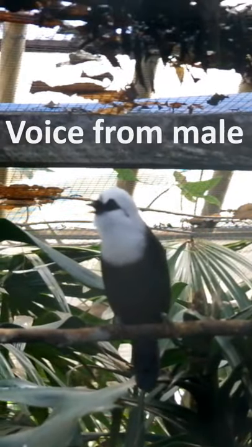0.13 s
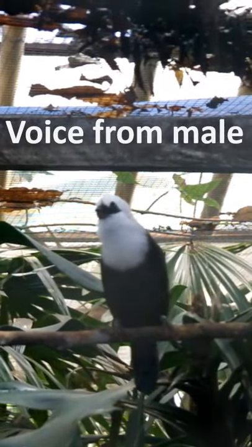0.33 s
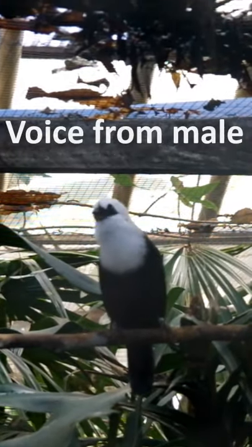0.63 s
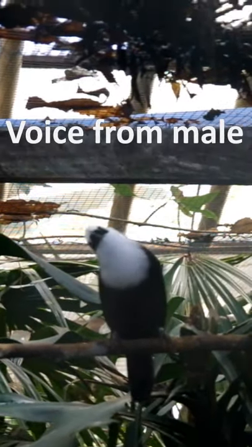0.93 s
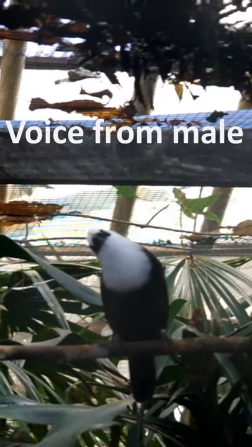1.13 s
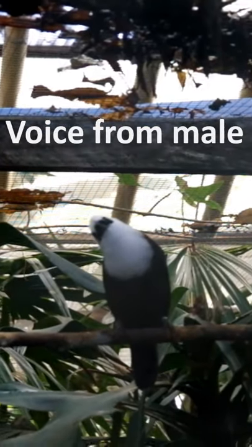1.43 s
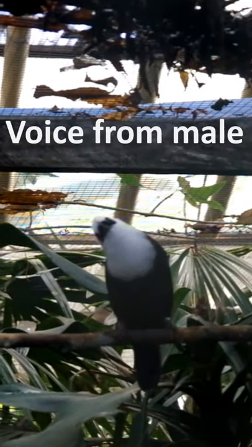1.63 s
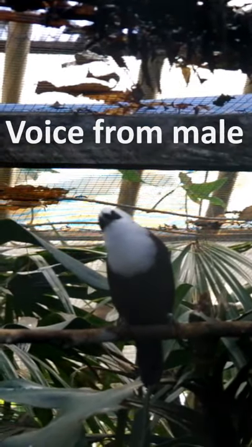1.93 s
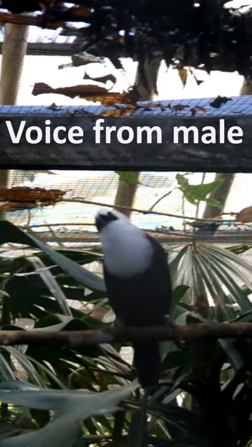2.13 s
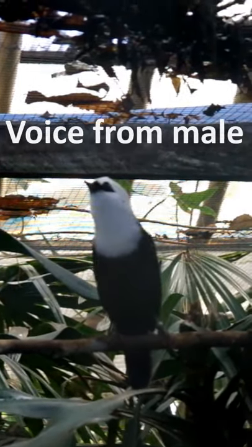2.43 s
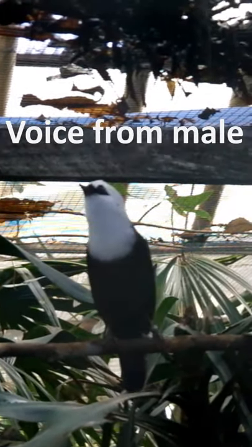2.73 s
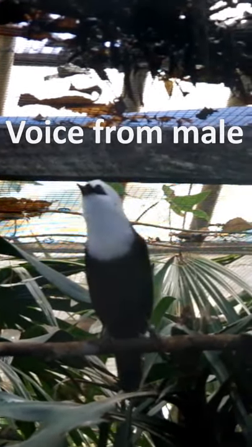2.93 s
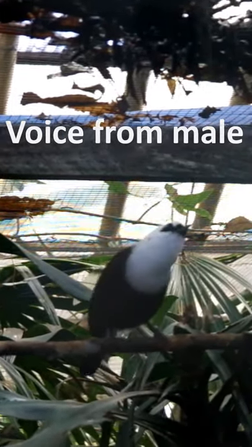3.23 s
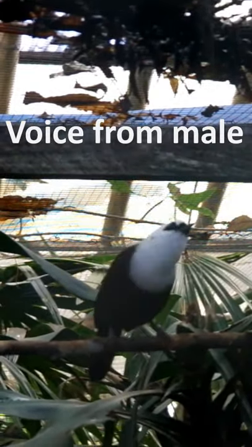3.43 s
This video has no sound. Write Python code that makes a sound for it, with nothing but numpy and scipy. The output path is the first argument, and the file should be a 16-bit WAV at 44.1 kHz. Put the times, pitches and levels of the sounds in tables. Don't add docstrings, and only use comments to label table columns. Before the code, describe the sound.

A near songbird bursts in at once with a very short, harsh squeal, then a stepped falling whistle at 0.13 s and a longer throbbing whistle from 0.34 to 0.63 s. Behind it another bird chatters in raspy, even pulses, about twelve a second, weakening until 1.6 s. Soft low calls come near 2.0 and 3.1 s, amid open-air hiss, leaf and wing rustles, faint high seeps and sparse echoes.

```python
import sys
import numpy as np
from scipy import signal
from scipy.io import wavfile
from scipy.ndimage import uniform_filter1d

SR = 44100
rng = np.random.default_rng(int(sys.argv[2]) if len(sys.argv) > 2 else 0)


def magnitude_from_level(level_db):
    exponent = np.asarray(level_db, float) / 20
    return 10 ** exponent


def transcribe(u):
    v = np.clip(np.atleast_2d(u).T, -1, 1)
    q = np.round(v * 32767).astype(np.int16)
    wavfile.write(sys.argv[1], SR, q)


N = 158319

# f/Hz, level/dB per Hz
AIR_COLOUR = [(25, 4), (120, -7.5), (300, -3.5), (1000, -2), (2500, -3), (3800, -4), (5000, -3.5),
              (12800, -4.5)]
# t/s, level/dB
AIR_LEVEL = [(0, -47), (0.601, -48.5), (.9, -48), (1.2, -44.5), (1.38, -47), (1.85, -47), (2.03, -49),
             (2.3, -43.5), (2.6, -50), (2.779, -55.5), (2.87, -53.5), (2.95, -50), (3.299, -49), (3.6, -49)]
# t/s, depth/dB
DROPOUTS = [(.136, -16), (.966, -14), (1.251, -14), (1.481, -15), (1.735, -8), (2.455, -12), (2.735, -22),
            (2.781, -18)]
# t/s, f/Hz, level/dB, beak opening/dB
SQUEAL = [
    (0, 1045, -30, -6),
    (.018, 1042, -11.5, -8),
    (.025, 1060, -24, -8),
    (.028, 1275, -14, -8),
    (.037, 1265, -14, -6),
    (.048, 1190, -18, 0),
    (.063, 1140, -14, -3),
    (.069, 850, -25, -22),
    (.084, 720, -50, -30),
]
SQUEAL_PARTIALS = [-28.5, 0.5, -26.5]
WHISTLE_PARTIALS = [1, -26.5]
SOFT_PARTIALS = [-20, 2, 1, -17]
# f/Hz, level/dB
THROAT = [(4500, -9), (5300, -9), (6000, -7), (7100, 0), (8200, -8.5), (9450, 7.5), (10500, -6)]
# t/s, level/dB, hold/s, t60/s
RUSTLES = [(0.012, -33, 0.017, .2), (0.347, -45, 0.034, 0.26), (2.798, -51.5, 0.022, 0.11),
           (0.018, -36.5, 0.026, 0.79), (1.6, -39.5, 0.022, 0.39), (1.754, -45, 0.016, 0.14),
           (2.055, -35, .012, 0.29), (2.095, -41.5, 0.038, .1), (2.18, -37, 0.022, 0.2),
           (2.253, -44.5, 0.081, 0.7), (1.878, -44.5, 0.026, 0.3), (2.478, -43.5, 0.03, 0.33),
           (3.079, -46, .015, 0.078), (3.28, -42, 0.03, 0.2)]
# f/Hz, level/dB per Hz
RUSTLE_COLOUR = [(100, -6.5), (400, -11.5), (1000, 0), (2500, -1), (3700, -5), (4700, 2), (8000, -7),
                 (12800, 0)]
# t/s, level/dB, f/Hz, lead-note level/dB
CHATTER = [(0.018, -29.5, 853, -21), (0.108, -31.5, 845, -48), (0.191, -29, 823, -55),
           (.268, -30, 856, -45), (0.345, -29, 853, -40), (0.429, -31, 843, -46),
           (0.507, -32.5, 852, -38.5), (0.585, -30.5, 851.5, -44), (0.664, -31, 845.5, -51),
           (.745, -31.5, 841, -45), (.826, -33, 825, -42), (.903, -33.5, 818.5, -35.5),
           (.983, -33.5, 816, -40), (1.066, -35.5, 813, -38.5), (1.143, -34.5, 822, -42.5),
           (1.218, -36, 826, -33.5), (1.303, -36, 803, -37.5), (1.384, -36.5, 806, -38),
           (1.465, -36, 822, -40), (1.546, -36, 809, -37)]
CHATTER_PARTIALS = [-25, -2.5, -13.5, -15.5, -49, -28, -28, -44, -31.5, -22.5]
# f/Hz, width/Hz, level/dB
RASP = [(1768, 420, 4.5), (2430, 450, 0.5), (3003, 210, -4.5), (3310, 270, -6.5), (5040, 500, -13),
        (8130, 470, -9), (10600, 1500, -9.5)]
# t/s, length/s, start f/Hz, end f/Hz, level/dB
BREATH = [(.025, .05, 5250, 4750, -32), (.06, .09, 4700, 4900, -45), (.025, .05, 6500, 6000, -32),
          (.07, .06, 6200, 6200, -42), (.03, .05, 9800, 9300, -27), (.07, .09, 9500, 9500, -39),
          (.148, .1, 6700, 7400, -38), (.195, .09, 6250, 6000, -41), (.35, .04, 6200, 5500, -43),
          (.405, .14, 6150, 5650, -39), (.4, .17, 7350, 7100, -38), (.55, .09, 7050, 7000, -48),
          (.41, .13, 9000, 8600, -46), (.45, .12, 4400, 4300, -50), (.46, .09, 11800, 11400, -52)]
# t/s, f/Hz, level/dB
SLIDE = [
    (.128, 1657, -35.5),
    (.15, 1415, -22.5),
    (.156, 1350, -20),
    (.173, 1369, -14.5),
    (.179, 1388, -31),
    (.196, 1238, -22.5),
    (.202, 1191, -19),
    (.226, 1189, -15.5),
    (.231, 1160, -39.5),
]
# t/s, f/Hz, level/dB
FLICK = [
    (.226, 1190, -36),
    (.231, 1120, -31),
    (.238, 930, -40),
    (.246, 700, -52),
]
# t/s, f/Hz, level/dB
LONG_WHISTLE = [(.338, 1664, -28), (.352, 1587, -32.5), (.364, 1428, -23.5), (.379, 1392, -18.5),
                (.388, 1328, -33), (.394, 1412, -12.5), (.404, 1421, -29), (.413, 1386, -15),
                (.422, 1445, -29.5),
                (.427, 1490, -16.5), (.445, 1448, -22.5), (.452, 1510, -37), (.457, 1462, -15.5),
                     (.468, 1472, -18.5), (.48, 1448, -16.5), (.49, 1455, -12.5), (.498, 1461, -41.5),
                     (.508, 1434, -18.5),
                (.547, 1418, -13.5), (.555, 1398, -25), (.562, 1410, -13), (.57, 1454, -30),
                    (.582, 1434, -23.5), (.604, 1405, -26), (.63, 1390, -57)]
# t/s, length/s, f/Hz, level/dB
SEEPS = [(.945, 0.053, 2250, -38), (1.092, 0.24, 5000, -57), (2.188, 0.073, 4600, -63),
         (2.666, 0.15, 7550, -60), (2.68, 0.16, 5030, -59), (3.1, 0.13, 7500, -65),
         (2.717, 0.2, 10720, -66.5), (2.905, 0.108, 5010, -57), (3.111, 0.14, 5050, -59)]
# t/s, f/Hz, level/dB, beak opening/dB
SOFT_FIRST = [(1.99, 584, -52, -7), (2.008, 594.7, -43, -1), (2.026, 661, -39, -0.5), (2.055, 663, -41, -1),
              (2.074, 640.4, -42, 1), (2.092, 614.6, -39, -1), (2.136, 614.5, -40.5, -2),
              (2.146, 605, -49.5, -2), (2.17, 610, -59, -4)]
SOFT_SECOND = [(3.1, 524, -61.5, -3), (3.132, 598, -44, 4.5), (3.15, 644, -43.5, -3.5),
               (3.172, 622, -39.5, -3.5), (3.188, 625, -51, 2), (3.198, 593, -54.5, 1),
               (3.21, 621, -52, -18), (3.232, 653, -51.5, -9), (3.248, 630, -71, -5)]
# f/Hz, t60/s
ROOM = [(500, 0.14), (1200, .5), (1450, 0.34), (2000, .42), (3000, 0.45), (8000, 0.22)]


def evened(x):
    return x / np.sqrt(np.mean(x ** 2) + 1e-20)


def read(points, hz):
    f, value = np.transpose(points)
    return np.interp(np.log(hz + 1), np.log(f + 1), value)


def add(mix, s, sound):
    part = mix[max(round(s * SR), 0):][:len(sound)]
    part += sound[:len(part)]


def fuzz(count, width_hz):
    r = np.exp(-np.pi * width_hz / SR)
    settle = 2000
    raw = rng.standard_normal((count + settle, 2)) @ [1, 1j]
    z = signal.lfilter([1], np.convolve([1, -r], [1, -r]), raw)[settle:]
    return z / np.sqrt(np.mean(abs(z) ** 2))


def noise(colour, patchy_db):
    frames, hz = N // 128 + 5, np.fft.rfftfreq(512, 1 / SR)
    a, b, patches = rng.standard_normal((frames, 257, 3)).T
    patches = uniform_filter1d(patches, size=14, axis=0)
    patches = evened(uniform_filter1d(patches, size=12, axis=1))
    z = (a + 1j * b) * magnitude_from_level(read(colour, hz)[:, None] + patchy_db * patches)
    return evened(signal.istft(z, nperseg=512, noverlap=384)[1][:N])


def voice(hz, rough, partials_db, width_hz):
    turns, out = 2 * np.pi * np.cumsum(hz) / SR, 0
    for k, db in enumerate(partials_db, 1):
        share = np.clip(rough * k ** 1.5, 0, 1)
        blur = np.sqrt(1 - share) + np.sqrt(share) * fuzz(len(hz), width_hz * k ** .6)
        out = out + magnitude_from_level(db) * np.sqrt(2) * (blur * np.exp(1j * k * turns)).real
    return out


def note(curve, low_db, top_db, rough, width_hz, count=6):
    s, hz, db, *beak = np.transpose(curve)
    t = np.arange(s[0], s[-1], 1 / SR)
    age = t - s[0]

    def smooth(values, size):
        return uniform_filter1d(np.interp(t, s, values), size=size, mode="nearest")

    hz, level, slow = smooth(hz, size=120), smooth(db, size=120), smooth(db, size=600)
    open_db = smooth(beak[0], size=300) if beak else np.interp(age, [.01, .06], [-10, 0])
    partials = [level + d + open_db * (k > 1) for k, d in enumerate(low_db)]
    for k in range(len(low_db) + 1, count + 1):
        partials.append(slow + open_db + top_db + read(THROAT, k * hz))
    return s[0], voice(hz, np.interp(age, [.02, .035], rough), partials, width_hz)


def bands(rows, rough, width_hz):
    out = np.zeros(N)
    for s, length, first_hz, last_hz, db in rows:
        u = np.arange(0, 1, 1 / (length * SR))
        tone = voice(first_hz + (last_hz - first_hz) * u, rough, [0], width_hz)
        add(out, s, magnitude_from_level(db) * np.sin(np.pi * u) ** .5 * tone)
    return out


def background(rustling):
    t = np.arange(N) / SR
    level = magnitude_from_level(np.interp(t, *np.transpose(AIR_LEVEL)))
    air = level * noise(AIR_COLOUR, patchy_db=2.0)
    dip_s = .008
    dip = magnitude_from_level(sum(db * np.exp(-((t - s) / dip_s) ** 4) for s, db in DROPOUTS))
    leftover = (1 - dip) * level * magnitude_from_level(-13) * noise(AIR_COLOUR, patchy_db=8)
    return dip * (rustling + air) + leftover


def squeal():
    out = np.zeros(N)
    add(out, *note(SQUEAL, SQUEAL_PARTIALS, top_db=-16, rough=(.01, .06), width_hz=200, count=9))
    return out


def rustles():
    t, power = np.arange(N) / SR, np.zeros(N)
    rise_s = 0.0081
    for s, db, hold, t60 in RUSTLES:
        rise = np.clip((t - s) / rise_s, 0, 1)
        decay_db = -60 * np.maximum(t - s - hold, 0) / t60
        power += (rise * magnitude_from_level(db + decay_db)) ** 2
    return np.sqrt(power) * noise(RUSTLE_COLOUR, patchy_db=3.5)


def chatter_tone(s, hz):
    length_s, sag, settle_s = .043, .02, .8
    u = np.arange(0, 1, 1 / (length_s * SR))
    glide = hz * rng.uniform(0.95, 1.01) * (1 + sag * (.5 - u))
    rough = .5 if s < settle_s else .07
    return np.sin(np.pi * u ** 0.69) * voice(glide, rough, CHATTER_PARTIALS, width_hz=147)


def chatter_rasp():
    length_s, rise_s, fade_s = .11, .012, .028
    t = np.arange(0, length_s, 1 / SR)
    rasp = sum(magnitude_from_level(d) * (fuzz(len(t), w) * np.exp(2j * np.pi * f * t)).real for f, w, d in RASP)
    return np.minimum(t / rise_s, 1) * np.exp(-(t / fade_s) ** 1.5 / 2) * rasp


def lead_note():
    hz, length_s = 2192, 0.02
    u = np.arange(0, 1, 1 / (length_s * SR))
    return np.sin(np.pi * u ** .75) * voice(hz + 0 * u, .05, [0], width_hz=60)


def chatter():
    out = np.zeros(N)
    tone_delay_s, rasp_db = .011, -5.5
    for s, db, hz, lead_db in CHATTER:
        add(out, s + tone_delay_s, magnitude_from_level(db) * chatter_tone(s, hz))
        add(out, s, magnitude_from_level(db + rasp_db) * chatter_rasp())
        add(out, s, magnitude_from_level(lead_db) * lead_note())
    return out


def breath():
    return bands(BREATH, rough=0.74, width_hz=410)


def sliding_whistles():
    out = np.zeros(N)
    long_whistle = LONG_WHISTLE
    add(out, *note(SLIDE, WHISTLE_PARTIALS, top_db=-39.5, rough=(.03, .02), width_hz=48))
    add(out, *note(FLICK, [0], top_db=-60, rough=(.5, .5), width_hz=200, count=1))
    add(out, *note(long_whistle, WHISTLE_PARTIALS, top_db=-26, rough=(.06, .02), width_hz=60))
    return out


def seeps():
    sag = 0.026
    rows = [(s, length, hz, hz * (1 - sag), db) for s, length, hz, db in SEEPS]
    return bands(rows, rough=0.88, width_hz=480)


def soft_calls():
    out = np.zeros(N)
    add(out, *note(SOFT_FIRST, SOFT_PARTIALS, top_db=-31, rough=(.04, .07), width_hz=110))
    add(out, *note(SOFT_SECOND, SOFT_PARTIALS, top_db=-32, rough=(.04, .07), width_hz=170))
    return out


def aviary(x):
    taps = np.zeros(SR)
    at = np.arange(300, SR - 20, 20)
    taps[at + rng.integers(0, 20, len(at))] = rng.choice([-1., 1.], len(at))
    hz, t, z = signal.stft(taps, SR, nperseg=256)
    decay = magnitude_from_level(-60 * t / read(ROOM, hz)[:, None])
    tail = signal.istft(z * decay, SR, nperseg=256)[1]
    return signal.fftconvolve(x, tail / np.linalg.norm(tail))[:N]


def scene():
    harsh = squeal()
    near = breath() + sliding_whistles() + soft_calls()
    far = chatter() + seeps()
    wet = aviary(magnitude_from_level(-8) * harsh + magnitude_from_level(-16) * near + magnitude_from_level(-11) * far)
    return (harsh + near + far + wet + background(rustles()))[None]


def top_cut(x):
    return signal.sosfilt(signal.butter(12, 13420, fs=SR, output="sos"), x)


def record(dry):
    edge_hz, offset = 12760, -.0269
    edge = signal.firwin(401, edge_hz, window=("kaiser", 7), fs=SR)[None]
    mix = signal.oaconvolve(dry, edge, "same") + offset
    return top_cut(mix)


dry = scene()
out = record(dry)
transcribe(out)
```